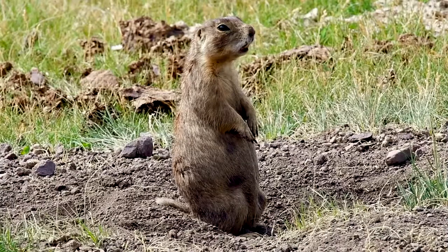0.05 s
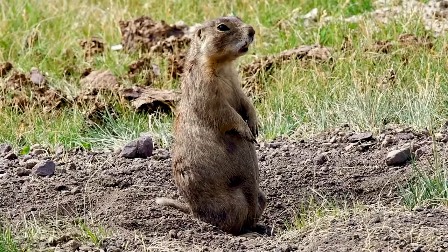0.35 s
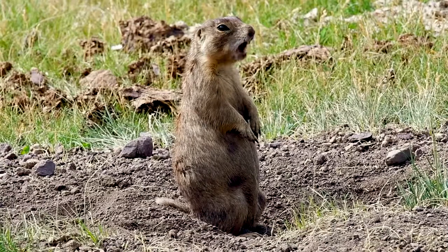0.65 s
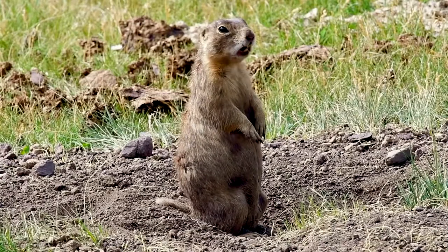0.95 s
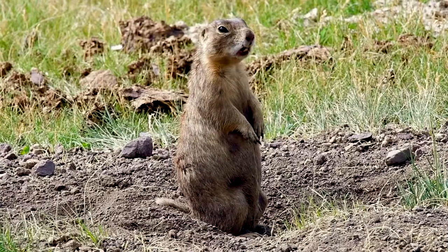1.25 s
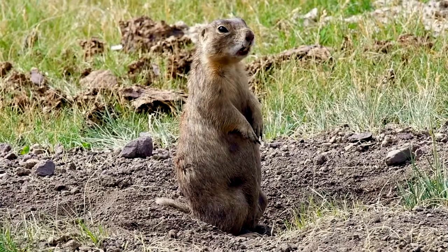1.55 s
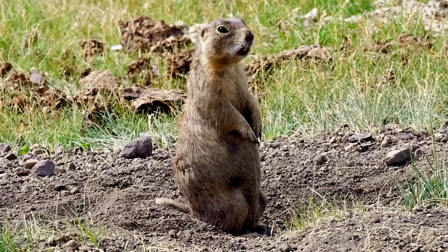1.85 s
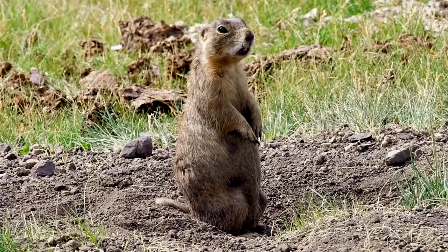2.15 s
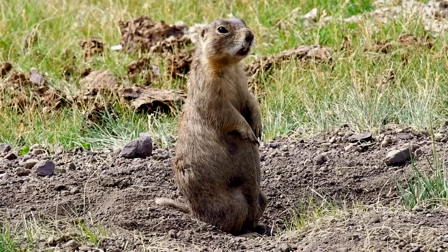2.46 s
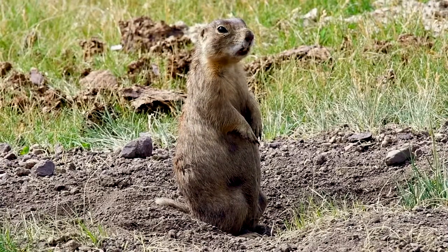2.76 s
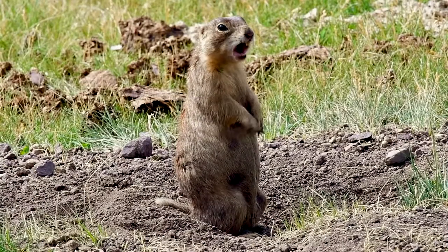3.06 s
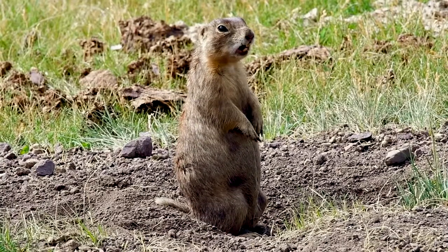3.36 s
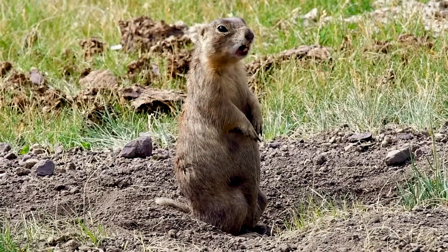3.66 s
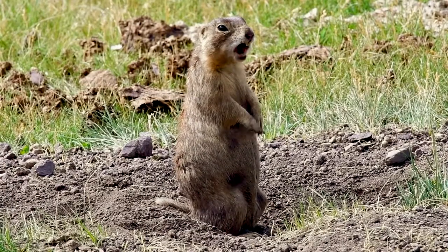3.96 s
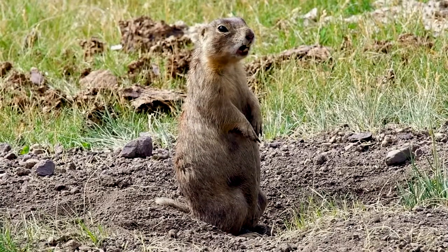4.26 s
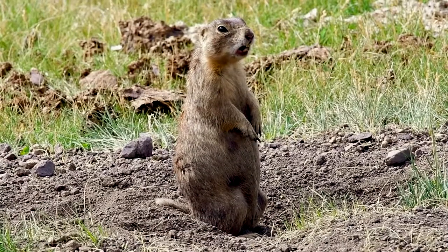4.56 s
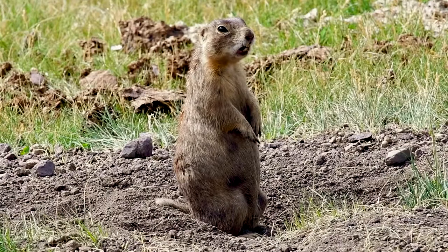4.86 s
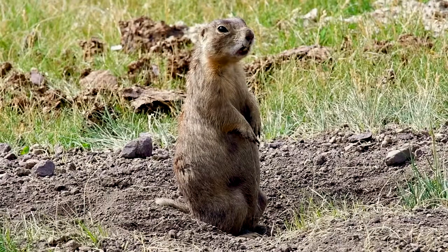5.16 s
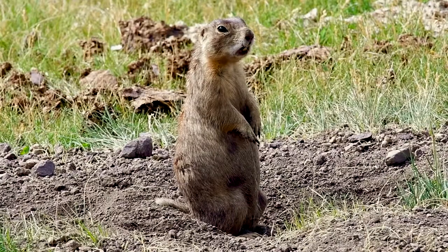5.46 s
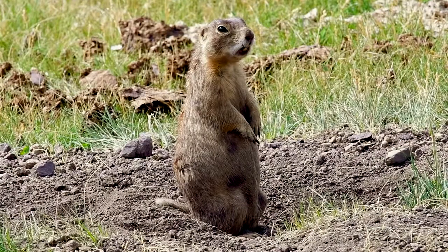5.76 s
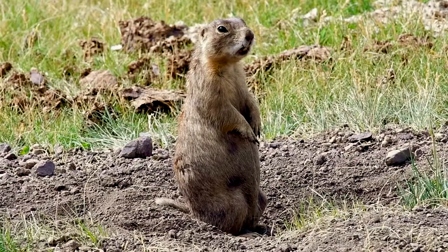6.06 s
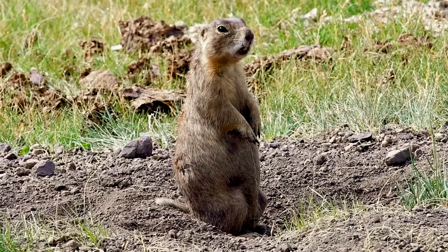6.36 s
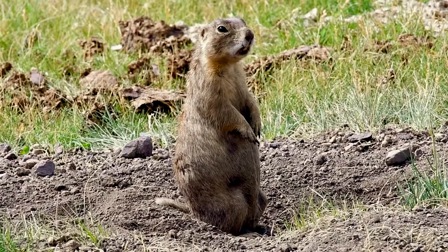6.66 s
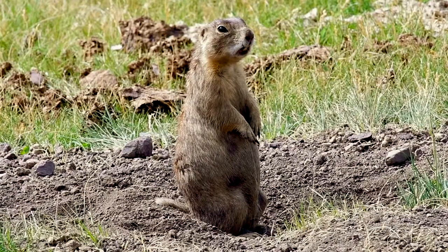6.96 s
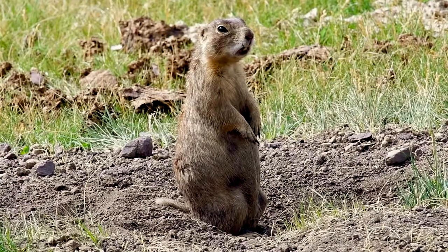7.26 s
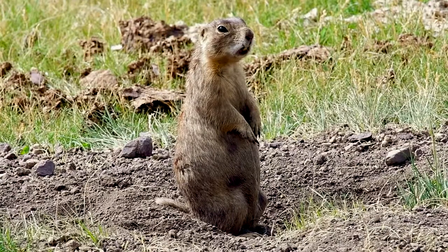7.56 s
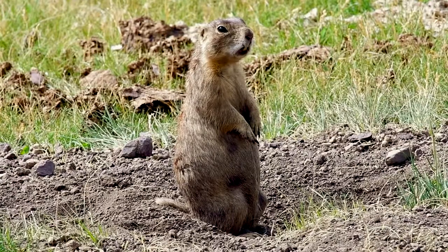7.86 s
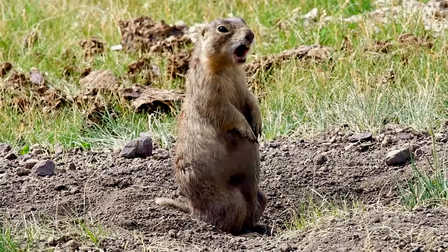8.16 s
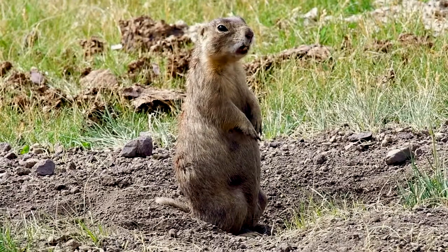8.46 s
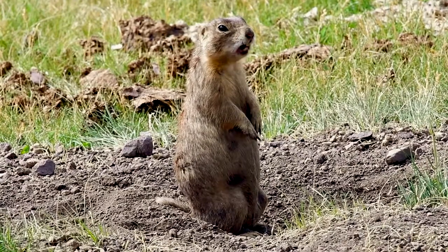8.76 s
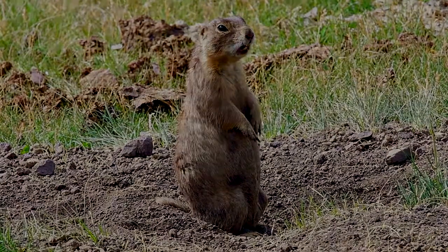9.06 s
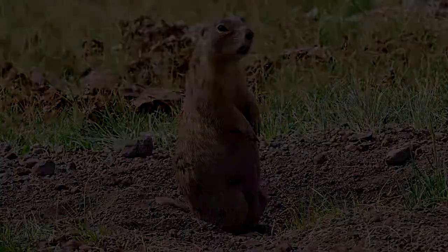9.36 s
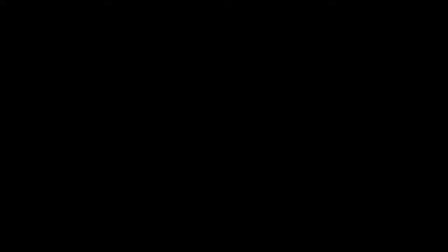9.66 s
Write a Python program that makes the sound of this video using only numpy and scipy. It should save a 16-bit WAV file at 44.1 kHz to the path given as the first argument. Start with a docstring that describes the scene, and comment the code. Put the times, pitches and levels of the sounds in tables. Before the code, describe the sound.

In an open meadow, seven short, shrill alarm barks come from a nearby prairie dog: a single one, a run of four, then a pair. Much fainter barks from the colony fill the gaps, and later a far bird whistles now and then. Tyres murmur and engines gently swell and fade on a distant road, while light gusts brush the microphone over a steady hiss.

```python
"""Prairie dog alarm

A prairie dog at its burrow gives seven sharp barks close by: pulses of its vocal folds, ringing in
throat and mouth, swoop up to a squeal and collapse into a creak. Others bark in bouts from far across
the meadow, and a distant bird whistles now and then. Tyres murmur on a far road to the left, engines
swell and fade, and gusts of a light wind buffet the microphone over a steady hiss."""
import sys
import numpy as np
from scipy import signal
from scipy.fft import rfft, irfft
from scipy.io import wavfile

SR = 44100
rng = np.random.default_rng(int(sys.argv[2]) if len(sys.argv) > 2 else 0)


def output_pcm(signal):
    """Save a mono or channel-first signal as 16-bit PCM at the path in sys.argv[1].

    Samples are clipped to [-1, 1] before scaling.
    """
    pcm = np.clip(np.atleast_2d(signal).T, -1, 1) * 32767
    wavfile.write(sys.argv[1], SR, np.round(pcm).astype(np.int16))


N = 428652
TIME = np.arange(N) / SR
END_S = 9.596


def gain_of(db):
    """Decibels to amplitude."""
    return 10 ** (np.asarray(db) / 20)


def unit_rms(x):
    """Scales to an rms of one."""
    return x / np.sqrt(np.mean(x ** 2) + 1e-20)


def ramp(x, start, end):
    """Goes in a straight line from 0 at start to 1 at end, and holds."""
    return np.clip((x - start) / (end - start), 0, 1)


def curve_at(rows, hz, column=1):
    """One column of a spectrum, joined by straight lines over log frequency."""
    table = np.transpose(rows)
    return np.interp(np.log(hz + 1), np.log(table[0]), table[column])


def fader_db(rows):
    """A level ride through the whole scene, straight from point to point."""
    return np.interp(TIME, *np.transpose(rows))


def add(mix, start_s, sound):
    """Mixes a sound in at its start time."""
    part = mix[..., max(round(start_s * SR), 0):][..., :sound.shape[-1]]
    part += sound[..., :part.shape[-1]]


def wander(samples, hz):
    """Smooth random drift of rms one, about as fast as hz."""
    lowpass = np.exp(-(np.fft.rfftfreq(samples, 1 / SR) / hz) ** 2)
    return unit_rms(irfft(rfft(rng.standard_normal(samples)) * lowpass, samples))


def noise(spectrum):
    """Steady noise of rms one with the given spectrum."""
    colour = gain_of(curve_at(spectrum, np.fft.rfftfreq(N, 1 / SR)))
    return unit_rms(irfft(rfft(rng.standard_normal(N)) * colour, N))


def ring(x, eq_db, size=2048):
    """Minimum-phase filter with the gain eq_db(Hz): it rings after each pulse, never before."""
    log_gain = np.log(gain_of(eq_db(abs(np.fft.fftfreq(size, 1 / SR)))))
    response = np.fft.ifft(np.exp(np.conj(signal.hilbert(log_gain)))).real
    return signal.fftconvolve(x, response[:size // 4])


def meadow_tail(x, wet_db, t60_s, predelay_s):
    """Echoes off grass and soil: a dying tail of random taps, different on each side."""
    t = np.arange(SR // 2) / SR
    taps = rng.standard_normal((2, len(t))) * gain_of(-60 * t / t60_s) * (t > predelay_s)
    return gain_of(wet_db) * signal.fftconvolve(x[None], taps / np.linalg.norm(taps[0]), axes=1)[:, :N]


# The road's level ride. Each row: time in seconds, relative level in dB.
ROAD_RIDE = [(0, -60.5), (1.8, -61), (5.5, -60.8), (7.2, -60.3), (7.6, -58), (8, -59.5), (8.9, -57.8),
             (9.6, -56.5)]
# Tyre tone and stereo image. Each row: frequency in Hz, relative level in dB, then, at full width,
# left over right in dB, left lead in radians, left-right coherence from 0 to 1.
TYRE_SPECTRUM = [(30, -31, 0.5, 3.5, 0.63), (100, -10.5, -10, -4, 0.98), (400.9, -2, 1, 1, 0.96),
                 (600, -3, 5, -0.48, .92), (1000, 0.5, 6, 1.5, 0.83), (1306, 2, 7.5, 2, .85),
                 (1860, -2.5, 0.5, 2.5, .9), (2620, -11.5, 10.5, 9.5, 0.21), (5000, -39.5, -13.5, -1, 0.26)]
def road(trim_db=3.5, swell_db=-0.28, full_width_hz=600):
    """Tyre roar from the left: most of it reaches the left side earlier and louder."""
    hz = np.fft.rfftfreq(N, 1 / SR)
    width = np.minimum(hz / full_width_hz, 1) ** 2  # long waves reach both sides alike
    left_db = width * curve_at(TYRE_SPECTRUM, hz, column=2)
    lead = width * curve_at(TYRE_SPECTRUM, hz, column=3)
    coherence = 1 - width ** 2 * (1 - curve_at(TYRE_SPECTRUM, hz, column=4))
    shared, separate = rfft(noise(TYRE_SPECTRUM)), rfft(noise(TYRE_SPECTRUM))
    left = shared * gain_of(left_db / 2) * np.exp(1j * lead)
    right = (coherence * shared + np.sqrt(1 - coherence ** 2) * separate) * gain_of(-left_db / 2)
    level_db = trim_db + fader_db(ROAD_RIDE) + swell_db * wander(N, hz=5)
    return irfft(np.array([left, right]), N) * gain_of(level_db)


# The engine drone's level ride. Each row: time in seconds, relative level in dB.
DRONE_RIDE = [(0, -55.5), (1, -55.5), (2.2, -60.5), (3.3, -62), (4.2, -60.5), (4.9, -60), (7.6, -57.5),
              (8.2, -63.5), (9.6, -59.5)]
# The tone of far exhausts. Each row: frequency in Hz, relative level in dB.
EXHAUST_SPECTRUM = [(25, -44), (70, -20.5), (115, -12.5), (165, 0), (250, -1), (320, -9), (450, -9),
                    (620, -16), (800, -16.5), (1500, -43.5)]
# Single engines. Each row: start in seconds, length in seconds, first and last pitch in Hz,
# note level in dB, rumble level in dB.
ENGINE_SWELLS = [(0, 0.43, 108.1, 111, -54, -56.5), (1.08, 0.59, 134.9, 109, -53, -54.5),
                 (5.044, .9, 138.7, 112.5, -57.5, -66.5), (7.001, 3.3, 76, 74.9, -60, -71)]
# The partials of an engine note. Each row: multiple of the pitch, relative level in dB.
ENGINE_PARTIALS = [(1, -13), (1.5, -10), (2, 0), (3, -12), (5, -13)]
def engines(drone_trim_db=-1, waver=0.026, flutter_db=2, peak_at=.74):
    """Far exhausts drone; single engines swell slowly with a gliding note and rumble, then fall away."""
    out = noise(EXHAUST_SPECTRUM) * gain_of(drone_trim_db + fader_db(DRONE_RIDE))
    rumble = noise(EXHAUST_SPECTRUM)
    for start_s, length_s, first_hz, last_hz, note_db, rumble_db in ENGINE_SWELLS:
        progress = ramp(TIME, start_s, start_s + length_s)
        swell = np.sin(np.pi / 2 * np.minimum(ramp(progress, 0, peak_at), ramp(progress, 1, peak_at)))
        pitch = (first_hz + (last_hz - first_hz) * progress) * (1 + waver * wander(N, hz=9.7))
        phase = 2 * np.pi * np.cumsum(pitch) / SR
        firing = sum(gain_of(db) * np.sin(order * phase) for order, db in ENGINE_PARTIALS)
        note = firing * gain_of(note_db + flutter_db * wander(N, hz=15))
        out += swell * (note + rumble * gain_of(rumble_db))
    return out


# The breeze's level ride. Each row: time in seconds, level in dB.
BREEZE_RIDE = [(0, -74), (6, -70), (9.6, -63)]
# Gusts on top of it. Each row: start in seconds, length in seconds, level in dB.
WIND_GUSTS = [(0.696, 0.084, -63), (2.273, 0.067, -49), (2.348, 0.4, -46), (2.417, 0.11, -47.5),
              (2.764, 0.066, -48), (2.824, 0.087, -39), (4.565, 0.056, -53), (6.137, 0.088, -62),
              (8.41, 0.066, -52), (8.505, 0.12, -59)]
# The tone of eddies on the microphone. Each row: frequency in Hz, relative level in dB.
EDDY_SPECTRUM = [(20, -23), (45, -5.5), (90, -1.5), (150, -5.5), (230, -10.5), (330, -24.5), (600, -40),
                 (1500, -66)]
def wind(attack_s=0.027, release_s=.04, lumps_db=2):
    """Gusts rise and die over a light breeze; their lumpy eddies press on both sides alike."""
    force = gain_of(fader_db(BREEZE_RIDE))
    for start_s, length_s, level_db in WIND_GUSTS:
        age = TIME - start_s
        force += gain_of(level_db) * ramp(age, 0, attack_s) * ramp(length_s - age, 0, release_s)
    return noise(EDDY_SPECTRUM) * force * gain_of(lumps_db * wander(N, hz=35))


# The tone of the noise floor. Each row: frequency in Hz, relative level in dB.
HISS_SPECTRUM = [(25, -13), (100, 0.5), (500, -2), (2000, -1), (2800, -1), (4000, -3.5), (6000, -4.5),
                 (8500, -8.5), (11000, -12), (13000, -11.5), (15500, -20)]
def hiss(level_db=-57, wide_above_hz=800):
    """Steady hiss of meadow and microphone, centred in the bass and wide in the treble."""
    highpass = signal.butter(2, wide_above_hz, "high", fs=SR, output="sos")
    side = signal.sosfilt(highpass, noise(HISS_SPECTRUM))
    mid = noise(HISS_SPECTRUM)
    return gain_of(level_db) * (mid + np.array([side, -side])) / np.sqrt(2)


def vocal_folds(length_s, top_hz, jitter=0.29, shimmer=1.3, rasp=0.55, creak_hz=700):
    """Vocal fold pulses: a slow buzz swoops up to a clean squeal, sags, and collapses into a creak."""
    sag_at, collapse_at, creak_at = .355, .716, .91  # shares of the bark's length
    attack_s, release_s, shut_s = .0105, .023, .008
    t = np.arange(round(length_s * SR)) / SR
    onset = 1 - ramp(t / length_s, 0, sag_at)
    sag = ramp(t / length_s, sag_at, collapse_at)
    collapse = ramp(t / length_s, collapse_at, creak_at)
    arch = 1 - .45 * onset ** 2.25 - .12 * sag ** 1.5 - .5 * collapse ** 1.1
    roughness = .017 + .055 * onset + .42 * collapse ** 2
    pitch = top_hz * arch * np.exp(jitter * roughness * wander(len(t), creak_hz))
    cycles = np.cumsum(pitch) / SR - .15
    orders = np.arange(1, 33)[:, None]
    harmonics = np.cos(2 * np.pi * orders * cycles) * (orders * pitch < SR / 2)
    pulses = unit_rms(harmonics.sum(0) * np.sqrt(pitch / top_hz))
    pulses *= np.exp(shimmer * roughness * wander(len(t), creak_hz))
    # air rushes through each time the folds open
    puffs = unit_rms(np.exp(-2 * (cycles % 1)) * rng.standard_normal(len(t)))
    # the push of air: a quick attack, a slow loss through the sag, a release at the end
    attack, release = ramp(t, 0, attack_s), ramp(t, length_s - release_s, length_s)
    push_db = -11.5 * (1 - attack) - 4.5 * sag - 19.5 * release
    return ramp(length_s - t, 0, shut_s) * gain_of(push_db) * (pulses + rasp * roughness * puffs)


# The resonances of throat and open mouth. Each row: frequency in Hz, relative gain in dB.
THROAT_EQ = [(600, -14.5), (1250, -23.5), (1750, -26), (2150, -14), (2550, -3.5), (3200, 2), (3550, 0.5),
             (3900, 1), (4650, -11.5), (5250, 1.5), (6400, 6.5), (7200, -10.5), (8600, -7.5), (11400, -20),
             (13000, -49), (16000, -57)]
def bark(length_s, top_hz, tuning=1, rolloff_db=0, rolloff_hz=2400):
    """The folds ring a throat scaled by tuning; distance and grass take rolloff_db an octave of treble."""
    def eq_db(hz):
        octaves_above = np.log2(np.maximum(hz / rolloff_hz, 1))
        return curve_at(THROAT_EQ, hz / tuning) - rolloff_db * octaves_above
    return unit_rms(ring(vocal_folds(length_s, top_hz), eq_db))


# The far voices, by name. Each row: bark length in seconds, top pitch in Hz, throat tuning factor,
# treble roll-off in dB per octave.
FAR_VOICES = {"quick": (.078, 1192, .85, 27), "bright": (.11, 1185, 1.08, 0), "thin": (.105, 1185, 1.24, 1),
              "low": (.11, 1162, 1.05, 13), "high": (.085, 1400, 1.08, 20), "muffled": (.11, 1175, .8, 20)}
# Bouts of far barks. Each row: voice, level in dB, start of each bark in seconds.
FAR_BOUTS = [("high", -66, [.18, 1.26]), ("bright", -68.5, [.9, 1.065]),
             ("thin", -66, [1.67, 1.89, 2.135, 2.39]), ("quick", -63, [1.725, 1.86, 2.003, 2.148, 2.32]),
             ("muffled", -65, [1.65, 1.83, 1.96, 2.13, 2.31]), ("high", -67, [2.53, 2.68, 3.79, 4.12]),
             ("bright", -67, [4.955, 5.36, 5.755, 6.16, 6.56]),
             ("quick", -56.5, [6.012, 6.155, 6.309, 6.453, 6.619, 6.793]), ("bright", -63.5, [7.06, 7.55]),
             ("low", -64, [7.7, 7.9, 8.16])]
def far_prairie_dogs(vary=0.004, colony_per_s=2, colony_db=-70, colony_hz=1314, colony_spread=0.075):
    """Neighbours bark in bouts, each in its own voice; the rest of the colony barks faintly at random."""
    out = np.zeros(N)
    for voice, level_db, starts in FAR_BOUTS:
        length_s, top_hz, tuning, rolloff_db = FAR_VOICES[voice]
        for start_s in starts:
            pitch = top_hz * (1 + vary * rng.standard_normal())
            add(out, start_s, gain_of(level_db) * bark(length_s, pitch, tuning, rolloff_db))
    length_s, _, tuning, rolloff_db = FAR_VOICES["quick"]
    for when, height in rng.random((round(colony_per_s * END_S), 2)):
        pitch = colony_hz * (1 + colony_spread * (2 * height - 1))
        add(out, when * END_S, gain_of(colony_db) * bark(length_s, pitch, tuning, rolloff_db))
    pan = gain_of([[-1], [1]])  # a little to the right
    return out * pan + meadow_tail(out, wet_db=-9, t60_s=.19, predelay_s=.0013)


# The close alarm barks. Each row: start in seconds, length in seconds, top pitch in Hz,
# relative level in dB, added lean to the right in dB.
NEAR_BARKS = [(0.7197, 0.11, 1307, -19, 1.7), (3.014, 0.11, 1295, -16, 1),
              (3.4878, 0.095, 1270, -18.5, 1.4), (3.9241, 0.1, 1267, -19, 1),
              (4.415, 0.097, 1262, -20, 0.7), (8.2017, 0.11, 1299, -17, .8),
              (8.645, 0.098, 1257, -19.5, 1.3)]
# How the microphone's two ports hear them. Each row: frequency in Hz, right over left in dB.
PORT_BALANCE = [(1200, -0.5), (2500, 1), (3700, -3), (4700, -4.5), (5400, 3.5), (6300, 3), (8000, -0.5),
                (11000, -7.5)]
def near_prairie_dog(trim_db=1.05, bounce_s=0.0024, bounce_db=-17):
    """Close, bright barks glance off the ground and leave a short, soft tail over the open meadow."""
    out = np.zeros((2, N))
    for start_s, length_s, top_hz, level_db, right_db in NEAR_BARKS:
        voice = gain_of(trim_db + level_db) * bark(length_s, top_hz)
        ports = [ring(voice, lambda hz: side * (curve_at(PORT_BALANCE, hz) + right_db))
                 for side in (-.5, .5)]
        add(out, start_s, np.array(ports))
    bounce = gain_of(bounce_db) * np.array([np.interp(TIME - bounce_s, TIME, side) for side in out])
    return out + bounce + meadow_tail(out.mean(0), wet_db=-24, t60_s=.15, predelay_s=.0046)


# The bird's calls. Each row: start in seconds, length in seconds, first and last pitch in Hz, level in dB.
BIRD_WHISTLES = [(4.76, .16, 2340, 1985, -70), (5.395, 0.21, 2290, 1734, -70.5),
                 (7.476, .13, 2510, 2234, -62), (9, 0.093, 2780, 2700, -71),
                 (9.038, 0.13, 2560, 2070, -62.5), (9.195, .09, 2760, 2610, -68),
                 (9.427, 0.096, 2780, 2660, -70)]
def bird(waver=.012):
    """Thin falling whistles, blurred by echoes on their way across the meadow."""
    out = np.zeros(N)
    for start_s, length_s, first_hz, last_hz, level_db in BIRD_WHISTLES:
        samples = round(length_s * SR)
        pitch = np.linspace(first_hz, last_hz, samples) * (1 + waver * wander(samples, hz=120))
        whistle = np.sin(2 * np.pi * np.cumsum(pitch) / SR) * np.hanning(samples)
        add(out, start_s, gain_of(level_db) * unit_rms(whistle))
    return out + meadow_tail(out, wet_db=-4, t60_s=.2, predelay_s=.002)


def scene():
    """Animal voices over a bed of far traffic, wind and hiss."""
    return near_prairie_dog() + far_prairie_dogs() + bird() + road() + engines() + wind() + hiss()


# The microphone's dead bands. Each row: centre in Hz, width in Hz.
MIC_NOTCHES = [(7650, 3250), (9600, 1400)]
def record(dry, cutoff_hz=15750, fade_s=.003):
    """The microphone's two treble notches, a quick fade into silence and the band limit."""
    out = dry
    for hz, width_hz in MIC_NOTCHES:
        out = signal.lfilter(*signal.iirnotch(hz, hz / width_hz, fs=SR), out)
    out = out * ramp(END_S - TIME, 0, fade_s)
    lowpass = signal.firwin(801, cutoff_hz, window=("kaiser", 9), fs=SR)
    return signal.oaconvolve(out, lowpass[None], "same")


dry = scene()
out = record(dry)
output_pcm(out)
```